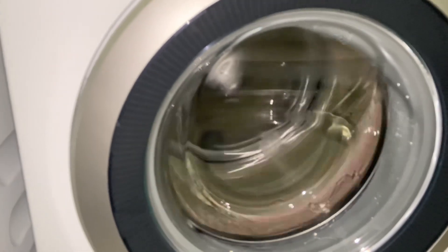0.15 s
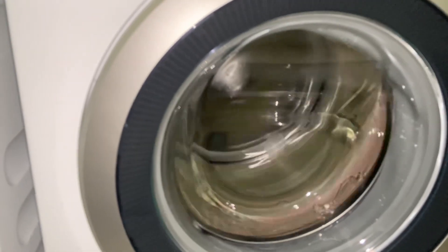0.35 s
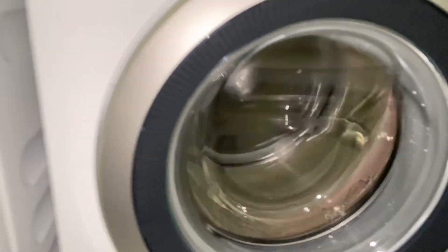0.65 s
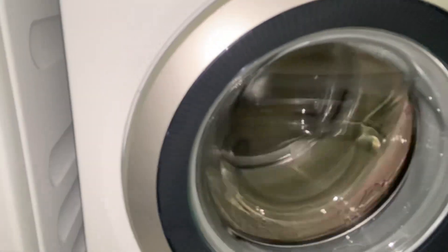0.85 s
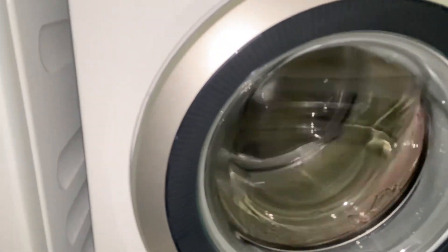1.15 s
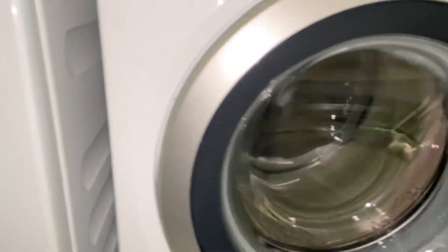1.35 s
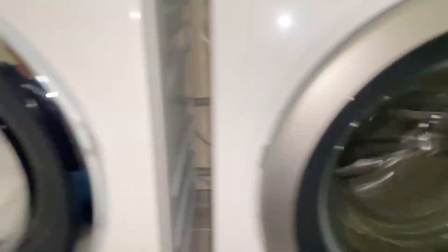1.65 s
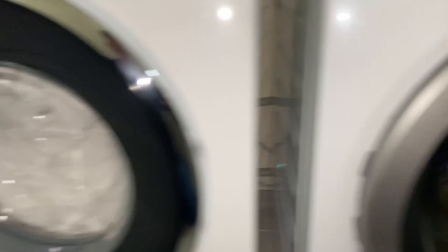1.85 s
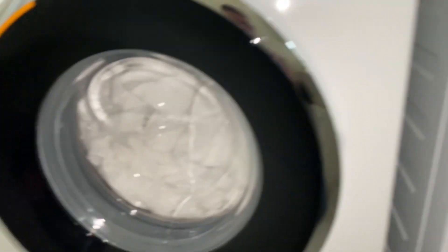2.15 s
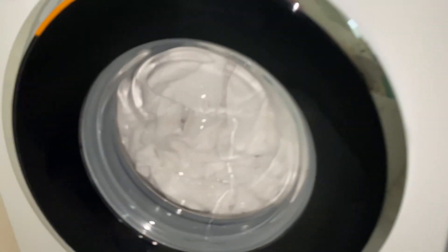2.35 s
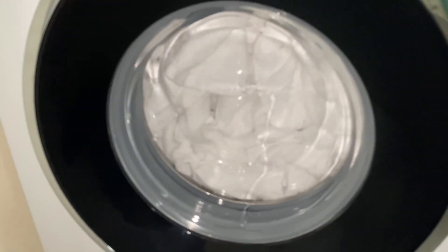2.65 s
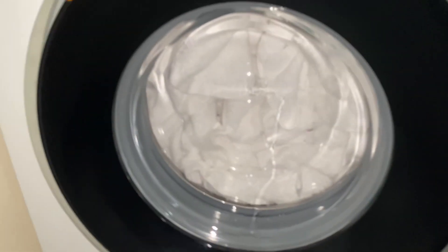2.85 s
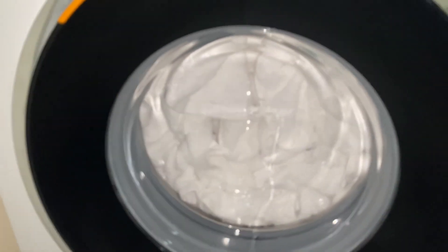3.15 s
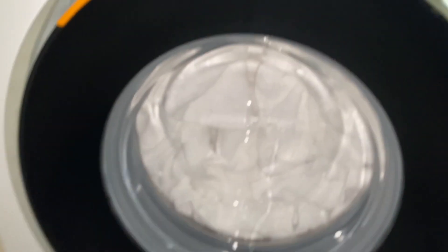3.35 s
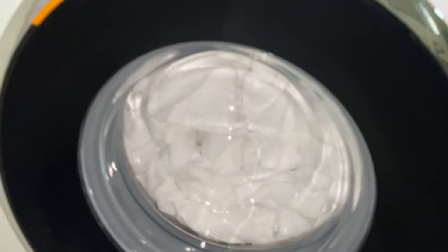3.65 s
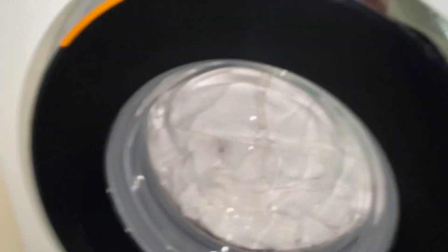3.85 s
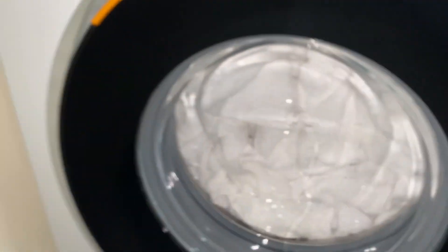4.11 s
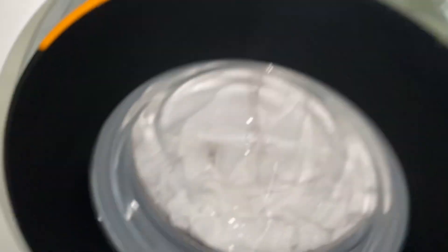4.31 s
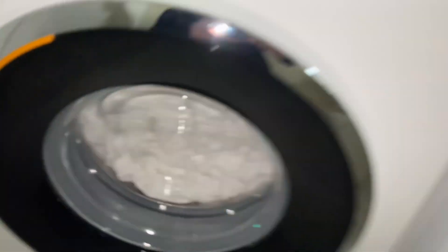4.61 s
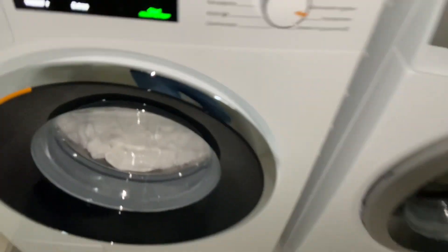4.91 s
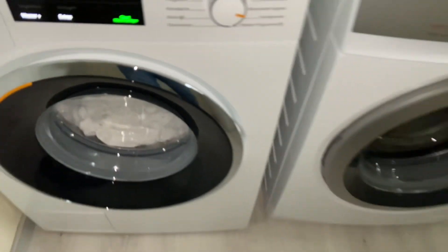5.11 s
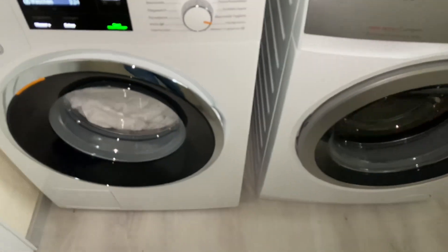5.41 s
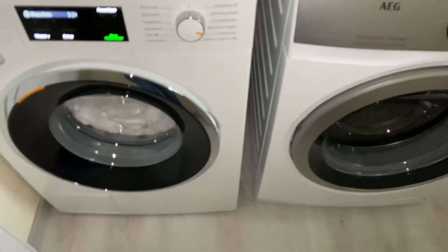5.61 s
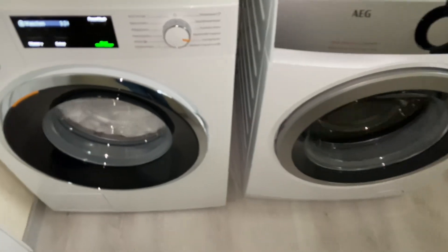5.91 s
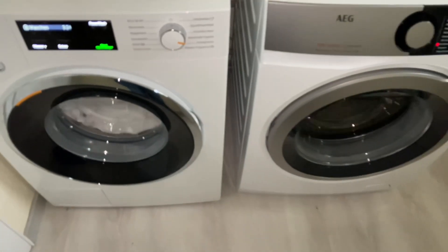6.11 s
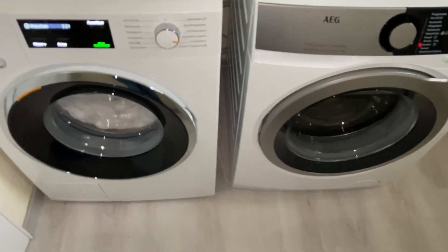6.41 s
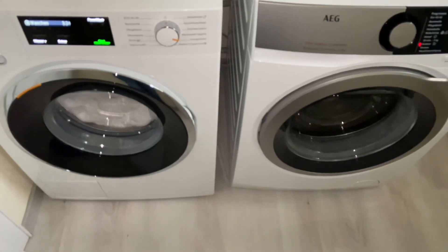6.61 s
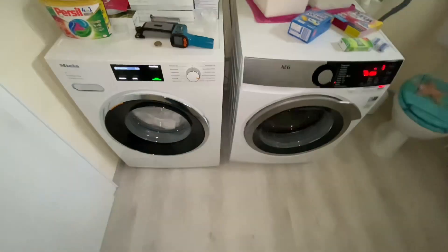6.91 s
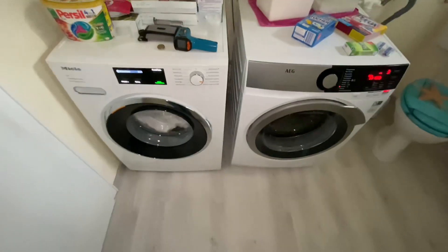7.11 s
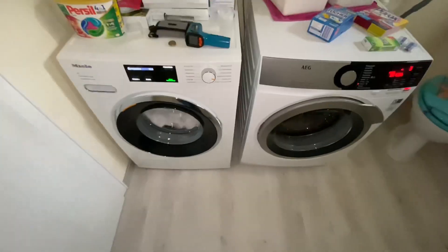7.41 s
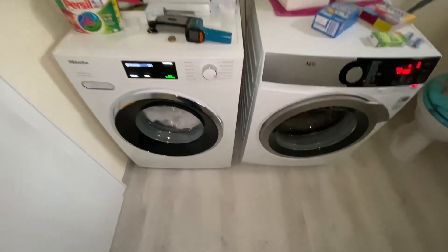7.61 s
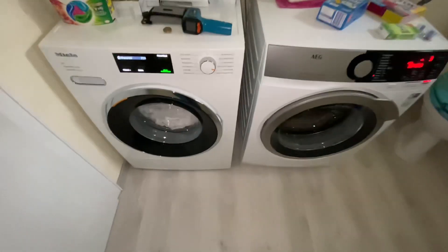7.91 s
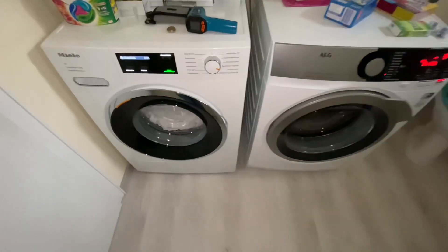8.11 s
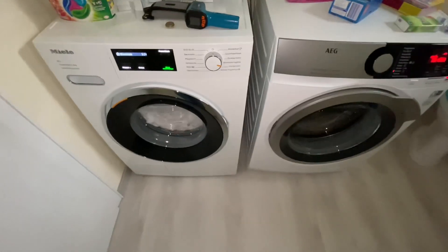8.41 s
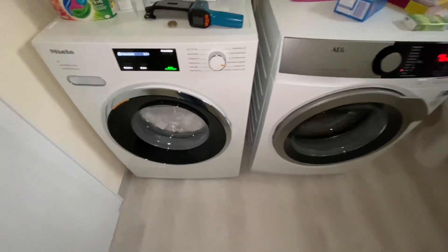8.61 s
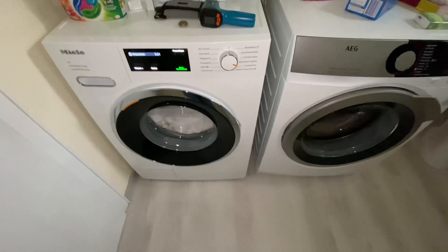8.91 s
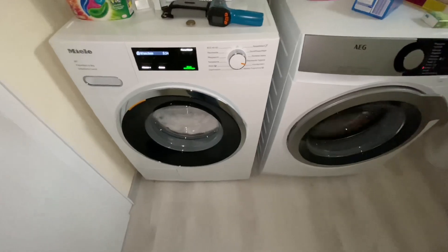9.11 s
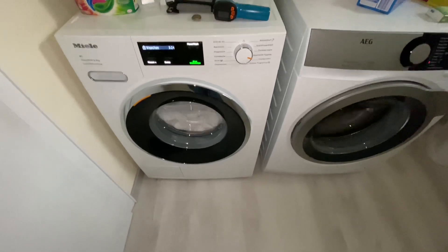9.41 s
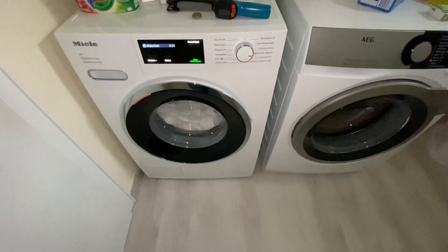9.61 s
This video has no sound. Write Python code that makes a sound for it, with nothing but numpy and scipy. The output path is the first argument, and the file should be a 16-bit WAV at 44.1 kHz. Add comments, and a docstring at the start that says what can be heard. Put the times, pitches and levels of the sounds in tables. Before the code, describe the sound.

Two washing machines spin steadily at full speed in a small hard-walled room, heard through a handheld stereo microphone for nearly ten seconds. Close to the first door, a thick low drone of drum and motor tones throbs about one and a half times a second, with rough cabinet buzz and smooth hiss. At 0.4 s a quick cluster of handling thumps rattles the microphone. A thin, high whine around 5 kHz swells and fades irregularly throughout. From 1.75 to 2 s the balance shifts toward the second door, the deep hum staying full. The hiss lifts briefly near 3.85 s. Around 4.7 s two softer, dull bumps accompany a step back; the deepest boom falls away. After 6.8 s the sound is more distant, its airy hiss wider; the whine peaks sharply near 7.7 s. From 8.25 s the tones shift subtly and some bass returns, the spin continuing to the end.

```python
"""Two washing machines spin side by side in a small hard-walled room, heard on a hand-held stereo recorder.
It starts at the right door: tones at multiples of the drum's turning rate, a throbbing pump hum, rough panels,
cabinet noise, a swelling motor whine and hiss. At 0.4 s the hand knocks the recorder: thumps with a rattle.
From 1.75 s it moves to the left door, from 4.55 s it steps back with two softer bumps, from 6.7 s further back;
each layer shifts in level on the way. From 8.25 s it leans in again, heard in four of the strong tones."""
import sys
import numpy as np
from scipy import signal
from scipy.fft import rfft, irfft, next_fast_len
from scipy.io import wavfile

SR = 44100
rng = np.random.default_rng(int(sys.argv[2]) if len(sys.argv) > 2 else 0)


def master_out(mix):
    """Clip the mix to full scale and print it as 16-bit PCM to the path in sys.argv[1]."""
    frames = np.transpose(np.atleast_2d(mix))
    ceiling = np.clip(frames, -1, 1)
    pcm = np.round(ceiling * 32767).astype(np.int16)
    wavfile.write(sys.argv[1], SR, pcm)


def boost_factor(decibels):
    """Convert a level in decibels to a linear amplitude factor."""
    exponent = np.asarray(decibels, float) / 20
    return 10 ** exponent


N = 429975   # samples
DRUM_HZ = 20.165   # turns a second
STEP = 5   # slow values, hum and low noise are worked out at every fifth sample
TIME = np.arange(N // STEP) * STEP / SR   # s, every fifth sample
FULL_TIME = np.arange(N) / SR   # s, every sample


def rms_one(x):
    """Scales a signal to an rms of 1."""
    return x / np.sqrt(np.mean(x ** 2) + 1e-20)


def in_time(rows, t):
    """Straight lines between rows that start with a time in seconds; one curve for each further column."""
    s, *columns = np.transpose(rows)
    return [np.interp(t, s, c) for c in columns]


def by_spot(right, left, back, far):
    """A value that follows the recorder: right door, left door, one step back, far back."""
    # Times in seconds: leaving the right door, reaching and leaving the left door,
    # reaching and leaving one step back, reaching far back.
    stands_s = [1.75, 2.0, 4.55, 5.0, 6.7, 6.9]
    return np.interp(TIME, stands_s, [right, left, left, back, back, far])


def drift(rate_hz):
    """Slow chance of spread 1: noise at 100 values a second through a double one-pole."""
    r = np.exp(-2 * np.pi * rate_hz / 100)
    white = rng.standard_normal(1500)
    slow = signal.lfilter([1], [1, -2 * r, r * r], white)[500:]
    return np.interp(TIME * 100, np.arange(len(slow)), rms_one(slow))


def full(x):
    """From every fifth sample to all samples."""
    return signal.resample_poly(x, STEP, 1, axis=-1)[..., :N]


def band(x, low_hz, high_hz, rate=SR):
    """Keeps what lies between two frequencies."""
    edges_hz = [low_hz, min(high_hz, .45 * rate)]
    return signal.sosfilt(signal.butter(2, edges_hz, "band", fs=rate, output="sos"), x)


def tone(phase, mid_db, side_db, turn):
    """A sine of given mid and side rms, as left and right; standing waves turn the side against the mid."""
    mid = boost_factor(mid_db) * np.sin(phase)
    side = boost_factor(side_db) * np.sin(phase + turn)
    return np.sqrt(2) * (mid + side * [[1], [-1]])


def hum(rows, wobble_db, shake_ms):
    """Steady lines whose level follows the listening spot and wavers as the hand moves."""
    out = 0
    uneven = TIME + shake_ms / 1000 * drift(2.5)   # the machine runs slightly unevenly
    for hz, *spots_db, side_db in rows:
        start, turn = rng.uniform(0, 2 * np.pi, 2)
        level_db = by_spot(*spots_db) + wobble_db * drift(2.7)
        side_level_db = side_db + wobble_db * drift(0.48)
        phase = 2 * np.pi * hz * uneven + start
        out = out + tone(phase, level_db, side_level_db, turn + 1.24 * drift(0.85))
    return out


def drum():
    """The drum hums at multiples, some of them halves, of its turning rate."""
    # Each row: multiple of the turning rate, mid level in dB at right door, at left door,
    # one step back and far back, side level in dB.
    multiples = [(2, -52, -49, -53, -52, -66), (4, -52, -57, -53, -60, -65), (6, -49, -42, -41, -41, -49),
                 (7, -43, -52, -48, -49, -51), (8, -47, -57, -43, -46, -53), (8.5, -54, -59, -54, -56, -64),
                 (9, -44, -43, -49, -54, -52), (9.5, -49, -49, -55, -51, -58),
                 (10, -49, -47, -48, -46, -59), (11, -50, -44, -63, -51, -52),
                 (12, -46, -56, -49, -51, -53), (13, -50, -52, -53, -53, -59),
                 (14, -64, -47, -62, -57, -65), (16, -51, -52, -51, -50, -56),
                 (17, -43, -41, -45, -45, -53), (18, -44, -55, -56, -48, -50),
                 (19, -51, -54, -49, -49, -57), (20, -53, -70, -48, -56, -62),
                 (21, -55, -51, -47, -52, -53), (22, -48, -60, -54, -52, -53),
                 (26, -56, -50, -71, -70, -56), (27, -46, -53, -49, -46, -55),
                 (29, -47, -51, -63, -57, -52), (30, -51, -48, -48, -50, -50),
                 (31, -51, -57, -54, -57, -59), (34, -54, -53, -50, -51, -55),
                 (35, -51, -57, -49, -50, -48), (37, -49, -46, -52, -59, -48),
                 (39, -53, -55, -47, -56, -54), (84, -64, -63, -65, -61, -61),
                 (105, -68, -69, -72, -66, -65), (168, -75, -69, -67, -65, -66)]
    return hum([(k * DRUM_HZ, *db) for k, *db in multiples], wobble_db=0.5, shake_ms=0.13)


def other_tones():
    """Other steady tones of belt, bearings and second machine."""
    # Each row: frequency in Hz, mid level in dB at right door, at left door,
    # one step back and far back, side level in dB.
    lines = [(67, -46, -49, -51, -52, -62), (291.3, -52, -53, -57, -50, -56),
             (327.8, -69, -56, -51, -49, -60), (437, -51, -62, -56, -64, -62),
             (553.5, -45, -53, -49, -50, -55), (635, -53, -57, -67, -50, -55),
             (713.8, -68, -57, -53, -61, -53), (830.4, -66, -64, -48, -53, -50),
             (845, -57, -51, -56, -55, -53), (1795, -68, -74, -67, -71, -68),
             (1806.5, -68, -71, -68, -70, -75), (1864, -71, -72, -67, -68, -68),
             (1879, -67, -75, -71, -66, -66), (1966.5, -81, -72, -69, -69, -72),
             (2540, -71, -71, -67, -65, -73), (2804, -78, -77, -69, -70, -78)]
    return hum(lines, wobble_db=2.5, shake_ms=0.09)


def pump():
    """Hum at twice the mains rate throbs as the rotor slips behind the field; the drum beats against it."""
    hum_hz, slip_hz = 99.97, 1.456
    slip_crest_s = 0.17   # first crest of the throb: hum and slip lines in step
    drum_meets_s = 0.9   # the drum's fifth multiple first falls in step with the hum
    # Each row: mid level in dB at right door, left door, one step back and far back.
    # The rows are the hum, its two slip lines below and the drum's fifth multiple.
    line_levels = [(-40.5, -38.5, -54, -49.5), (-42, -38.5, -45.5, -45.5), (-45, -47.5, -54, -47),
                   (-37.5, -39.5, -58, -47)]
    slip = slip_hz * (TIME - slip_crest_s)
    beat = (5 * DRUM_HZ - hum_hz) * (TIME - drum_meets_s)
    out = 0
    for offset, spots_db in zip([0, -slip, -2 * slip, beat], line_levels):   # in turns
        level_db = by_spot(*spots_db) + 0.73 * drift(1.5)
        out = out + tone(2 * np.pi * (hum_hz * TIME + offset), level_db, level_db - 24, 1.3)
    return out


def strong_tones(wobble_db):
    """The six tones that stand out most, wavering as the hand moves through their standing waves."""
    # Frequency of each tone in Hz.
    tones_hz = [60.5, 211.7, 302.5, 645.3, 654, 1648.8]
    # Side against mid of each tone in dB.
    sides_db = [-20, -14, -15, -22, -8, 5]
    # The two lowest tones pass through their standing waves, the boom through a null.
    # Each row: time in seconds, mid level in dB of the lowest tone, of the second.
    boom = [(0, -32.5, -33), (2.0, -34.5, -33), (3.0, -30.5, -38.5), (4.6, -33, -34), (5.5, -47, -38),
            (6.6, -55, -46), (8.0, -45, -41.5), (8.8, -44, -42), (9.75, -38, -41)]
    # Each row is one of the other four tones: mid level in dB at right door, left door,
    # one step back, far back, leaning in again.
    others = [(-44.5, -39.5, -45, -42.5, -45.5), (-54, -49.5, -43.5, -41.5, -43),
              (-46.5, -45.5, -50, -42, -52), (-58.5, -59.5, -56.5, -57.5, -61)]
    # Start and end of leaning in again, in seconds.
    lean_in_s = [8.25, 9.2]
    leaning = np.interp(TIME, lean_in_s, [0, 1])
    levels_db = in_time(boom, TIME)
    for *spots_db, leant_db in others:
        levels_db.append(by_spot(*spots_db) + leaning * (leant_db - spots_db[-1]))
    out = 0
    for hz, side_db, level_db, waver_db in zip(tones_hz, sides_db, levels_db, wobble_db):
        slip = hz / 900 * drift(3.25)   # higher tones waver more in phase
        level_db = level_db + waver_db * drift(3.4)
        side_level_db = level_db + side_db + 0.83 * drift(1.8)
        out = out + tone(2 * np.pi * hz * TIME + slip, level_db, side_level_db, 2.4 + drift(0.53))
    return out


def panels(fade_db):
    """Cabinet panels sing roughly: noise in narrow resonances, unrelated at the two ports, fading in and out."""
    # Centre of each resonance in Hz.
    centres_hz = [550, 665, 750, 1655, 1805, 1880, 2130, 2250, 2530, 2960, 3386]
    # Each row: width in Hz, mid level in dB at right door, left door, one step back, far back.
    resonances = [(30, -46.5, -59.5, -62, -47), (35.6, -67, -54.5, -44.5, -43.5),
                  (34.4, -44.5, -44.5, -44, -49), (30, -59, -73, -72, -73.5), (30, -80, -64, -59, -58),
                  (39.8, -63, -72, -61.5, -63.5), (29.8, -68, -71, -64.5, -78),
                  (35, -67, -59.5, -59, -64.5), (30.6, -65, -65, -63.5, -62), (35, -65, -75, -72, -67.5),
                  (14, -67, -67, -68, -65)]
    out = 0
    for hz, (width, *spots_db) in zip(centres_hz, resonances):
        white = rng.standard_normal((2, len(TIME)))
        noise = band(white, hz - width / 2, hz + width / 2, SR / STEP)
        gain = boost_factor(by_spot(*spots_db) + fade_db * drift(2.74))
        out = out + gain * rms_one(noise) * np.sqrt(2)
    return out


def rumble(patchy_db):
    """Third-octave bands of cabinet and room noise; each follows the spot and flickers, the bass most."""
    # Each row: frequency in Hz, mid level in dB per Hz at right door, at left door, one step back
    # and far back (all ahead of the treble cut below), side minus mid in dB.
    spectrum = np.array([(30, -77, -58, -75, -83, -7), (48.4, -89, -64, -67, -78, -10),
                         (75, -55.5, -55.5, -61, -57.5, -13), (115, -64, -61.5, -59, -77, -28),
                         (145, -73, -84, -75, -62.5, 7), (190, -58, -54, -57, -59, -4),
                         (232, -59.5, -71.5, -69.5, -75, 4.5), (280, -62, -63.5, -62.5, -67.5, -3),
                         (450, -64, -64, -62, -63, -5), (690, -67, -69, -66, -64, -3.5),
                         (916, -68, -69, -70.5, -69.5, 0), (1450, -77.5, -79, -79.5, -79, 0),
                         (2860, -85.5, -83.5, -84.5, -82.5, -2), (5180, -91, -90, -90.5, -90.5, -2),
                         (8200, -102, -100, -100, -92, 14)])
    out, edges = [0, 0], 25 * 2 ** np.arange(0, 8.1, 1 / 3)   # Hz
    rates, times = [SR / STEP, SR], [TIME, FULL_TIME]   # low bands need only every fifth sample
    # 0 dB per Hz; neighbouring bands take turns between two noises
    white = [rng.standard_normal((2, 2, len(t))) * np.sqrt(rate / 2) for rate, t in zip(rates, times)]
    for k, (low, high) in enumerate(zip(edges, edges[1:])):
        fine = int(high > 1700)
        log_centre = np.log(low * high) / 2
        *spots_db, side_db = [np.interp(log_centre, np.log(spectrum[:, 0]), c) for c in spectrum.T[1:]]
        level_db = by_spot(*spots_db) + patchy_db[fine] * drift(5.0)
        gain = np.interp(times[fine], TIME, boost_factor(level_db))
        noise = band(white[fine][k % 2], low, high, rates[fine])
        out[fine] = out[fine] + gain * noise * [[1], [boost_factor(side_db)]]
    treble_cut = signal.butter(4, 6400, fs=SR, output="sos")
    mid, side = full(out[0]) + signal.sosfilt(treble_cut, out[1])
    return np.array([mid + side, mid - side])


def whine_levels():
    """Flat-topped swells where the recorder passes loud spots of the standing waves; dB of mid and side."""
    # Each row: middle in seconds, length in seconds, mid peak in dB, side peak in dB,
    # before the floor and flutter are added.
    swells = [(.35, 1, -53, -49), (0.943, 0.35, -57, -61), (1.396, 0.31, -45.5, -63), (1.73, 0.1, -47, -54),
              (1.93, 0.18, -54, -50), (2.317, 0.36, -47, -55), (2.668, 0.28, -48.5, -64),
              (2.967, 0.13, -51.5, -52), (3.5, 0.56, -50.5, -63), (3.9, .15, -66, -52),
              (4.44, .16, -49, -57), (4.8, 0.35, -69, -52), (5.02, 0.27, -49, -58), (5.45, 0.16, -52, -45),
              (6.0, 0.12, -67, -48), (6.21, 0.14, -48.5, -62), (6.55, 0.5, -64, -54),
              (7.154, 0.68, -45.5, -52), (7.54, 0.13, -47.5, -51), (7.722, 0.22, -37, -43),
              (8.166, 0.23, -52, -49), (8.533, 0.45, -54, -47), (9.008, 0.26, -46.5, -58),
              (9.5, 0.58, -46.5, -50)]
    floors_db, flutter_db = [-66, -62], 3   # floor between swells, mid and side
    s, length, *peaks_db = np.transpose(swells)
    shape = np.exp(-np.abs(2 * (TIME[:, None] - s) / length) ** 3.3)
    return [20 * np.log10(boost_factor(floor_db) + shape @ boost_factor(db)) + flutter_db * drift(6.8)
            for db, floor_db in zip(peaks_db, floors_db)]


def whine():
    """Motor slot tone, with weaker lines one and five drum turns and one slower-drum turn to each side."""
    slot_hz, second_drum_hz = 5079.5, 14.2   # turns a second of the slower machine
    mid_db, side_db = [np.interp(FULL_TIME, TIME, db) for db in whine_levels()]
    bend = np.interp(FULL_TIME, TIME, 1.1 * drift(1.6))   # radians; the moving hand bends the pitch
    phase = 2 * np.pi * slot_hz * FULL_TIME + bend
    out = tone(phase, mid_db, side_db, np.interp(FULL_TIME, TIME, 2.0 * drift(2.2)))
    aways_hz = np.outer([DRUM_HZ, 5 * DRUM_HZ, second_drum_hz], [-1, 1]).ravel()
    for away_hz, level_db in zip(aways_hz, [-63, -63, -75, -72, -65, -63]):
        fade_db, side_fade_db, slip = [np.interp(FULL_TIME, TIME, drift(4.1)) for _ in range(3)]
        line = phase + 2 * np.pi * away_hz * FULL_TIME + 1.1 * slip
        out += tone(line, level_db + 4 * fade_db, level_db + 4 * side_fade_db, 1.45)
    return out


def air():
    """Air rush: one smooth hiss reaches the right port first; another fills the room, unrelated at the ports."""
    # Each row: time in seconds, level in dB of the near hiss from the right (ahead of its lift
    # around 7 kHz), level in dB of the hiss spread through the room.
    rush = [(0, -54.5, -81), (3.7, -53.5, -84), (3.85, -48.5, -70), (4.02, -52.5, -83), (6.7, -56, -74),
            (6.85, -56.5, -50.5), (9.75, -56.5, -51)]
    lag_s, port_turn = 0.0002573, 1.0   # left port hears the near hiss late, turned in phase (radians)
    near_db, room_db = in_time(rush, FULL_TIME)
    size = next_fast_len(N)
    near = rms_one(band(rng.standard_normal(size), 3100, 12900))
    near = near + .5 * band(near, 5140, 8350)   # fullest around 7 kHz
    hz = np.arange(size // 2 + 1) * SR / size
    late = irfft(rfft(near) * np.exp(-1j * (2 * np.pi * hz * lag_s + port_turn)), size)
    room = rms_one(band(band(rng.standard_normal((2, N)), 4600, 9700), 4600, 9800))
    return boost_factor(near_db) * np.array([late[:N], near[:N]]) + boost_factor(room_db) * room


def ring(clicks, hz, t60):
    """A unit click sets a dying sine ringing, of height 1 before its decay."""
    r, w = boost_factor(-60 / (t60 * SR)), 2 * np.pi * hz / SR
    return signal.lfilter([0, np.sin(w)], [1, -2 * r * np.cos(w), r * r], clicks + 1e-18)


def dying_away(clicks, t60):
    """Each click becomes a level that falls by 60 dB in t60 seconds."""
    return signal.lfilter([1], [1, -boost_factor(-60 / (t60 * SR))], clicks + 1e-18)


def knock():
    """Each bump of the hand pushes the membrane for about a cycle, with a dull tail and a short casing rattle."""
    # Each row: time in seconds, height in dB before decay and filters, frequency in Hz,
    # +1 push or -1 pull, starting level of the rattle in dB before its filters.
    bumps = [(0.419, -6, 75, -1, -48), (0.4327, -3.5, 190, -1, -30.5), (.449, -9, 207, 1, -32),
             (0.469, -12, 90, -1, -39), (.478, -7, 80.5, 1, -35), (0.4955, -5.5, 70, 1, -44),
             (4.66, -13, 50, 1, -60), (4.721, -16, 45, 1, -60)]
    thud_db = -20   # the casing's dull tail against each bump
    out, rattle, pushes = np.zeros(N), np.zeros(N), np.zeros(N)
    for s, height_db, hz, way, rattle_db in bumps:
        push = np.zeros(N)
        push[round(s * SR)] = 1
        out += np.sign(way) * boost_factor(height_db) * ring(push, hz, 1.8 / hz)
        rattle += boost_factor(rattle_db) * push
        pushes += boost_factor(height_db + thud_db) * push
    dying, tail = dying_away(rattle, t60=0.04), dying_away(pushes, t60=0.28)
    white = rng.standard_normal((3, N))
    # two casing resonances over a weaker broad noise
    casing = band(white[:2], 2150, 2450) + band(white[:2], 2800, 3200) + .4 * band(white[:2], 500, 6000)
    thud = band(tail * rms_one(band(white[2], 36, 290)), 35, 460)
    return band(out, 25, 1500) + band(dying * rms_one(casing), 500, 5500) + thud


def lean_bass(stereo):
    """The bass leans to the right: what lies below about 450 Hz is raised there and lowered on the left."""
    # Each row: time in seconds, left-right gain in dB for the bass (negative: right is louder).
    lean = [(0.0, -2), (1.54, -1), (2.39, -3.5), (4.1, -3), (4.7, -3.5), (5.81, -2.5), (6.19, -3.5),
            (6.81, -5), (7.3, -1), (8.01, -3.5), (9.75, -4)]
    (lean_db,) = in_time(lean, FULL_TIME)
    bass = signal.sosfilt(signal.butter(1, 450, fs=SR, output="sos"), stereo)
    return stereo + bass * (boost_factor(lean_db * [[.5], [-.5]]) - 1)


def scene():
    """Machines, air and knock together, left and right; only the machine noise without the whine leans."""
    lines = drum() + other_tones() + pump() + strong_tones(wobble_db=[1.1, 1.1, 2.8, 1.7, 2.4, 2.0])
    lines = lines + panels(fade_db=2.2)
    machines = rumble(patchy_db=[1.2, .6]) + full(lines)   # patchy: bands below and above 1.7 kHz
    return lean_bass(machines) + whine() + air() + knock()


def roll_off(x):
    """The treble ends steeply here."""
    return signal.sosfilt(signal.butter(12, 16740, fs=SR, output="sos"), x)


def record(dry):
    """The recorder cuts the deepest bass and the top."""
    dry = signal.sosfilt(signal.butter(4, 36, "high", fs=SR, output="sos"), dry)
    dry = signal.sosfilt(signal.cheby2(20, 50, 16000, fs=SR, output="sos"), dry)
    return roll_off(dry)


dry = scene()
out = record(dry)
master_out(out)
```